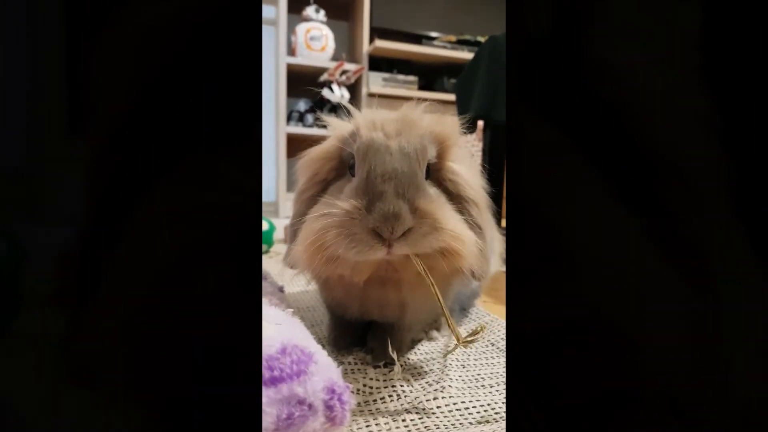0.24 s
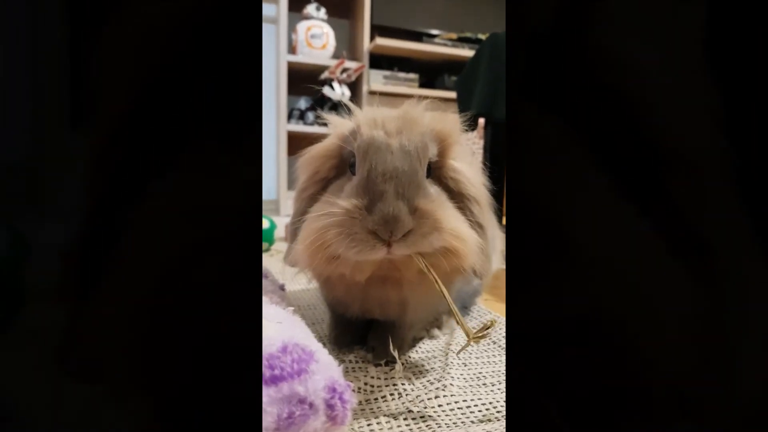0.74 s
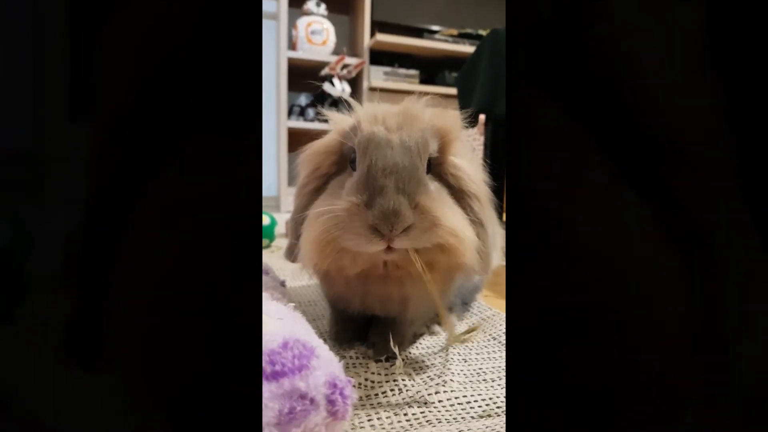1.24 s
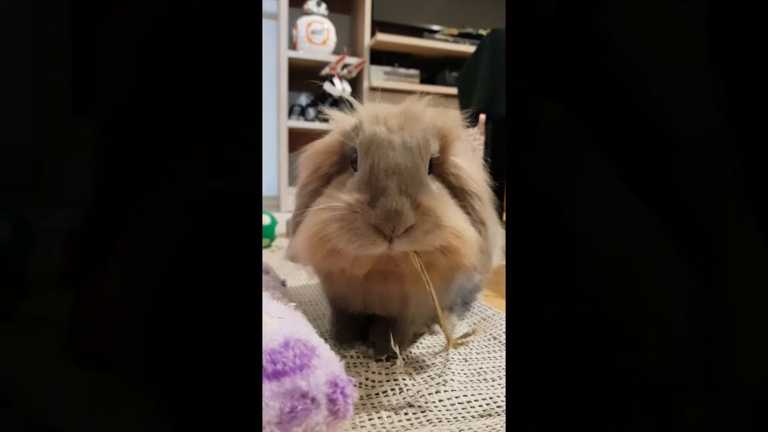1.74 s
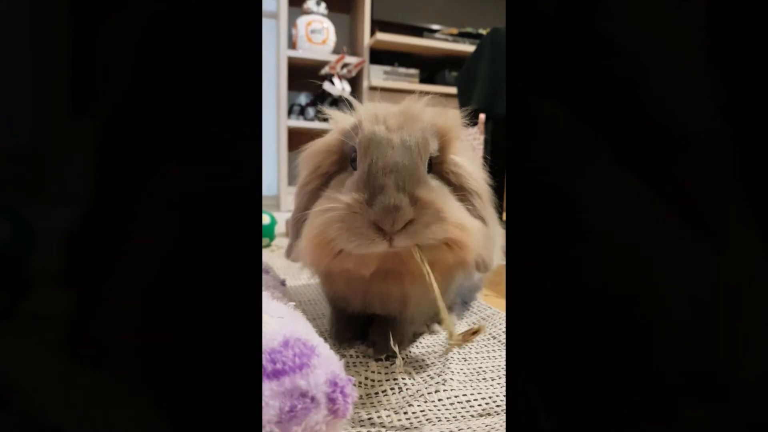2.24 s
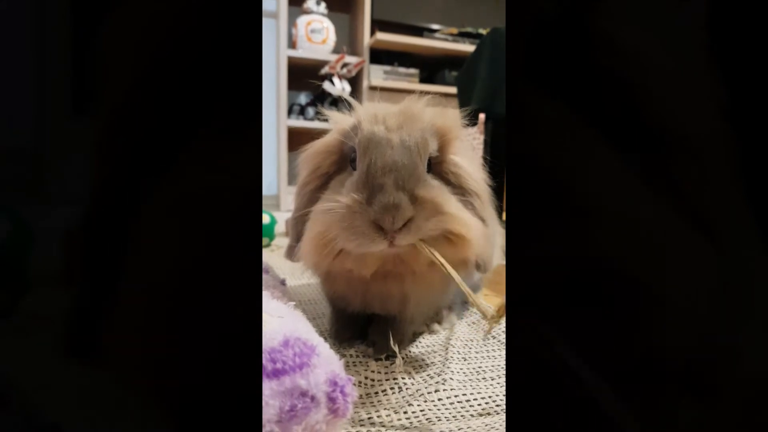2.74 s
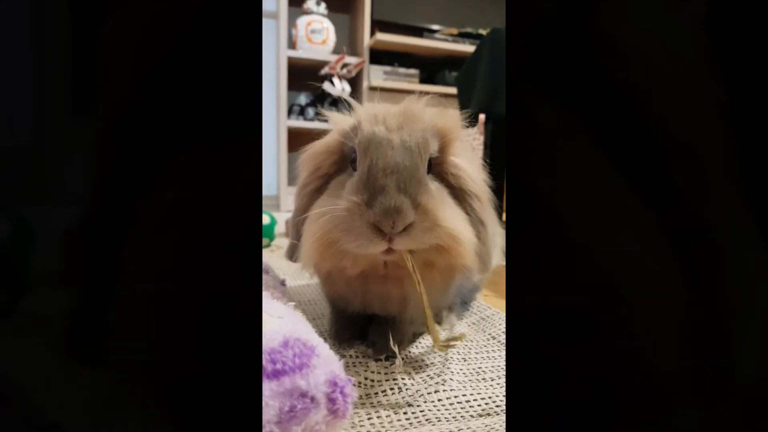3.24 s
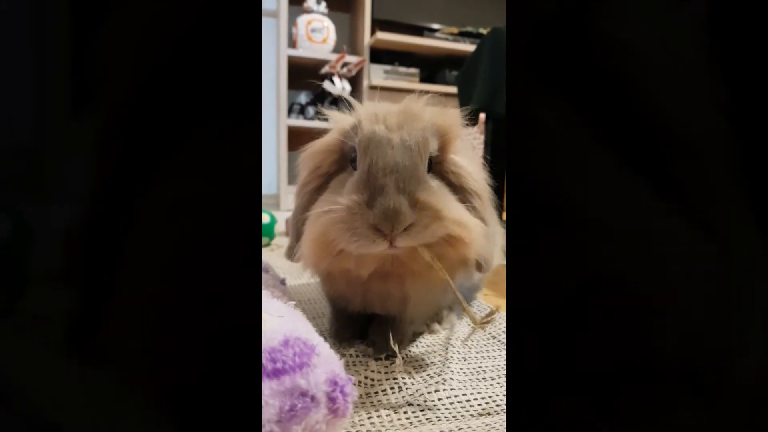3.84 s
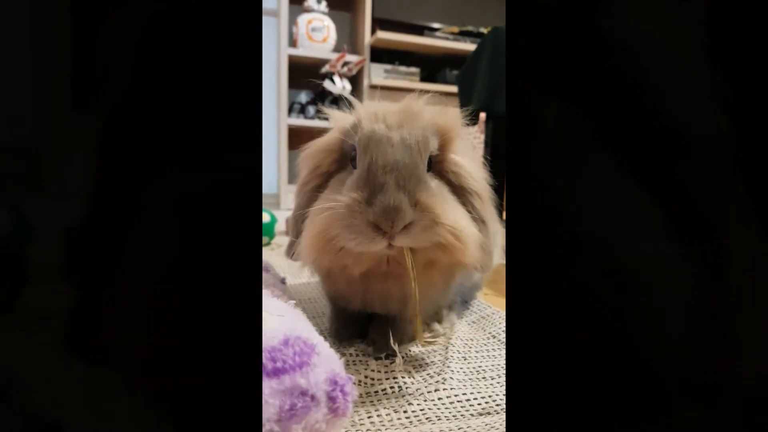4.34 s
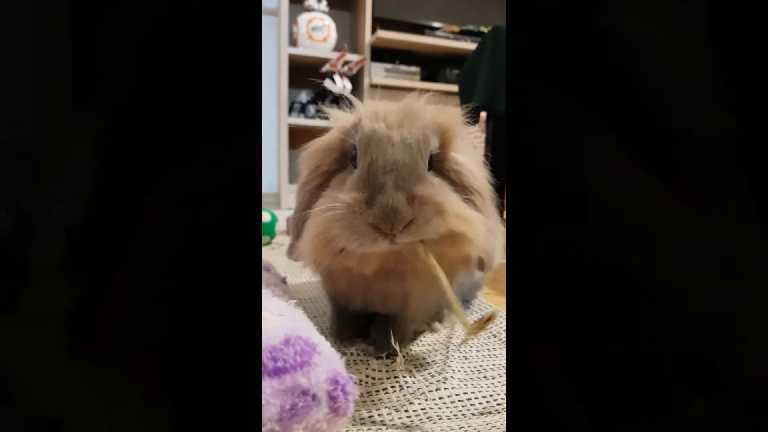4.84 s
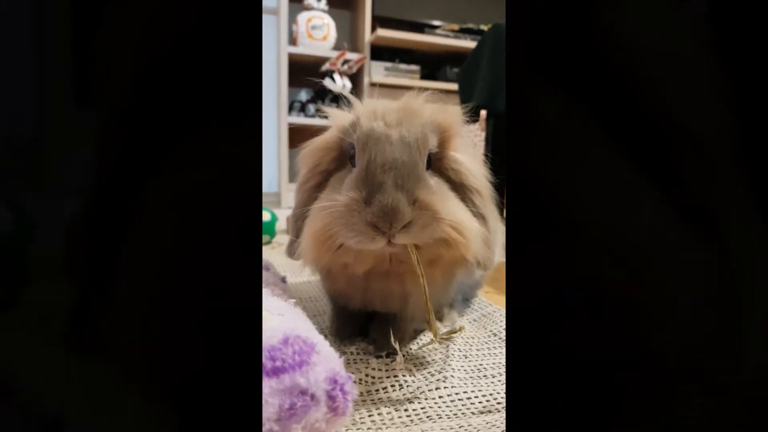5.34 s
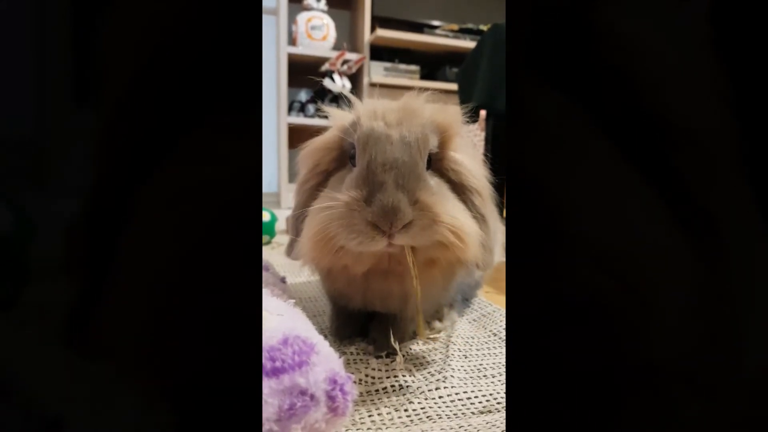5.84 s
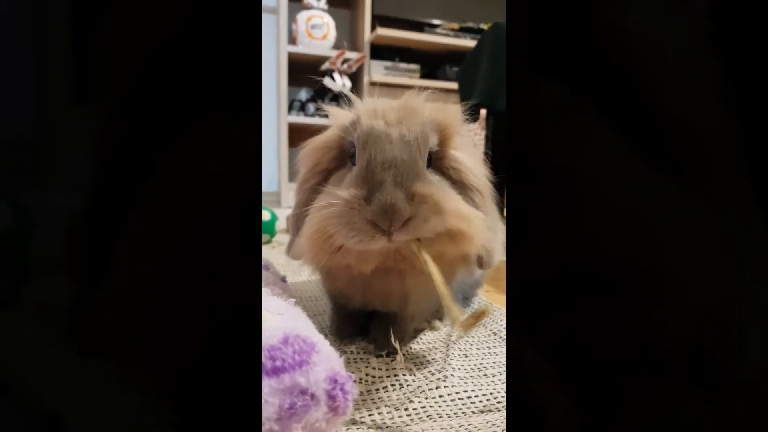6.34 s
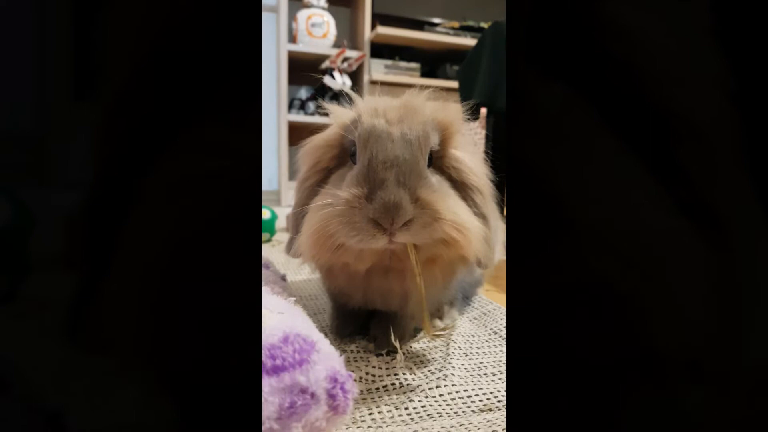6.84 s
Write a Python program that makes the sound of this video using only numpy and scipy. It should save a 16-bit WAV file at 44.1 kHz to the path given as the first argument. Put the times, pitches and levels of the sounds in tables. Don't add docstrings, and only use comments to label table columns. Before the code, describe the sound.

A rabbit chews hay near a hand-held phone in a still room. Small bright ticks and papery rustles sit left over a faint motor hum; the sharpest bite comes near three seconds. The right side is blocked by a fingertip, giving much louder bassy handling boom, dull presses and skin rubs, with repeated heavy knocks from five seconds that then ease off.

```python
import sys
import numpy as np
from scipy import signal
from scipy.fft import rfft, irfft, next_fast_len
from scipy.io import wavfile
from scipy.ndimage import uniform_filter1d, map_coordinates

SR = 44100
rng = np.random.default_rng(int(sys.argv[2]) if len(sys.argv) > 2 else 0)


def magnitude_from_level(level_db):
    exponent = np.asarray(level_db, float) / 20
    return 10 ** exponent


def master(y):
    cut = np.clip(np.atleast_2d(y).T, -1, 1)
    pcm = np.round(cut * 32767)
    wavfile.write(sys.argv[1], SR, pcm.astype(np.int16))


N = 312580


def unit(x):
    return x / np.sqrt(np.mean(x ** 2) + 1e-20)


def along(points, hz):
    f, db = np.transpose(points)
    return magnitude_from_level(np.interp(np.log(hz + 1), np.log(f + 1), db))


def bell(hz, centre_hz, octaves):
    return np.exp(-.5 * (np.log2((hz + 1) / centre_hz) / octaves) ** 2)


def hump(t, middle, half):
    return np.exp(-.5 * ((t - middle) / half) ** 2)


def coloured(x, gain):
    size = next_fast_len(len(x) + 4096)
    spectrum = rfft(x, size) * gain(np.fft.rfftfreq(size, 1 / SR))
    return irfft(spectrum, size)[:len(x)]


def noise(spectrum):
    white = rng.standard_normal(N + SR) * np.sqrt(SR / 2)
    return coloured(white, lambda hz: along(spectrum, hz))[SR // 2:][:N]


def wobble(rate):
    knots = rng.standard_normal(int(N * 40 / SR))
    return map_coordinates(knots, [np.arange(N) * min(rate, 30) / SR])


def add(track, s, sound):
    i = round(s * SR)
    sound = sound[max(-i, 0):len(track) - i]
    track[max(i, 0):][:len(sound)] += sound


# f/Hz, level/dB per Hz
OPEN_AIR_SPECTRUM = [(15, -125), (25, -106), (75, -95.5), (150, -91.5), (240, -97.5), (330, -102),
                     (600, -109), (1200, -112), (3000, -118.5), (5500, -124), (7200, -129.5),
                     (8800, -129.5), (12000, -118.5), (15500, -120.5)]
# f/Hz, level/dB, unsteadiness/dB
HUM_PARTIALS = [(119.8, -67, 1), (126.7, -77, 1.5), (80.2, -77, 2), (99, -82, 2), (240, -88, 3)]
# t/s, level/dB (peak), f/Hz
BODY_BUMPS = [
    (.335, -50, 45),
    (.98, -67, 45),
    (2.787, -56, 54),
    (6.494, -53, 45),
]


def room():
    t = np.arange(N) / SR
    out = noise(OPEN_AIR_SPECTRUM) * magnitude_from_level(0.37)
    drone_level = magnitude_from_level(-78 + 2.5 * wobble(4))
    out += drone_level * unit(coloured(rng.standard_normal(N), lambda f: bell(f, 240, .12)))
    for hz, db, unsteady_db in HUM_PARTIALS:
        level = np.sqrt(2) * magnitude_from_level(db + unsteady_db * wobble(6))
        out += level * np.sin(2 * np.pi * hz * t + .15 * wobble(5))
    short = t[:3000]
    for s, db, hz in BODY_BUMPS:
        add(out, s, magnitude_from_level(db) * np.sin(2 * np.pi * hz * short) * hump(short, .012, .006))
    return out


# f/Hz, level/dB per Hz
SEALED_SPECTRUM = [(60, -130), (200, -98), (300, -101), (500, -110), (1000, -115), (2000, -117.5),
                   (4500, -123.5), (7200, -130.5), (8800, -130.5), (12000, -118.5), (15500, -120)]


def sealed_hiss():
    return noise(SEALED_SPECTRUM) * magnitude_from_level(-0.3)


# t/s, level/dB
TREMOR = [(0.0, -35), (0.16, -41.5), (0.55, -44.5), (0.73, -42), (0.87, -47.5), (1.25, -43.5), (1.75, -42),
          (1.95, -42.5), (2.7, -45), (2.9, -38.5), (3.2, -45), (3.8, -45.5), (4.15, -40.5), (4.35, -47),
          (4.65, -40), (5.15, -43), (5.7, -37), (7.09, -46.5)]
# t/s, depth/dB, half length/s
STILL_MOMENTS = [(0.242, 12, 0.028), (0.438, 10.5, 0.029), (1.106, 5, 0.027), (1.4, 13.5, 0.028),
                 (1.583, 2.5, 0.062), (1.702, -2, 0.0084), (1.927, 8, 0.045), (2.153, 5.5, 0.036),
                 (2.237, 4.5, 0.012), (2.366, 8, 0.07), (2.769, 25.5, .012), (3.077, 9.5, 0.077),
                 (3.382, 17, 0.023), (4.292, 3, 0.073), (4.893, 22.5, 0.012), (4.965, 14, 0.015),
                 (5.19, 5.5, 0.024), (5.313, 15.5, 0.01), (5.414, 12.5, 0.029), (5.51, 18, 0.019),
                 (5.79, 9.5, 0.034), (5.909, 21, .015), (6.062, 12.5, 0.046), (6.221, 10, 0.023),
                 (6.353, 0, 0.017), (6.451, 9, 0.023), (6.534, 14, .015), (6.795, 7.5, 0.013),
                 (6.897, 14, 0.0072)]


def tremor_db():
    t = np.arange(N) / SR
    shaken = np.zeros(N)
    for s, db, *_ in contacts():
        shake_db = min(db - 8, -32.5)
        shaken += magnitude_from_level(shake_db) * hump(t, s, 0.028)
    course = magnitude_from_level(np.interp(t, *np.transpose(TREMOR)))
    level_db = 20 * np.log10(np.maximum(course, shaken))
    for s, depth_db, half in STILL_MOMENTS:
        level_db -= depth_db * hump(t, s, half)
    return level_db


def steadiness():
    t = np.arange(N) / SR
    free = np.ones(N)
    for s, *_ in contacts():
        free *= 1 - .75 * hump(t, s + .008, .018)
    return free


# f/Hz, level/dB per Hz
BOOM_SPECTRUM = [(15, -33), (25, -19), (40, 2.5), (52, 5), (68, 1), (90, -9), (125, -29.5), (170, -40),
                 (300, -90.5)]
# f/Hz, level/dB per Hz
RUBBING_SPECTRUM = [(70, -24), (110, 15.5), (150, 4), (220, -3), (330, -12.5), (450, -39.5), (900, -72.5),
                    (1500, -82)]
# t/s, level/dB
SKIN_CREEP = [(0, 1), (.6, 5), (.85, -2), (1.3, 2), (2.0, -4), (2.7, -5.5), (3.2, 0), (3.95, 4.5),
              (4.4, -4.5), (4.75, 2.5), (5.4, 1.5), (5.85, -3), (6.55, 2), (7.09, 4.5)]


def hand():
    boom_db = tremor_db()
    boom = noise(BOOM_SPECTRUM)
    swell = np.sqrt(np.abs(uniform_filter1d(unit(boom) ** 2, 2600)) + .05)
    boom = unit(boom / swell ** 0.62)
    rub = unit(unit(noise(RUBBING_SPECTRUM)) * magnitude_from_level(0.87 * wobble(27)))
    rub_db = -66 + 1.3 * (boom_db + 44)
    rub_db += 2.5 * wobble(7.1)
    rub_db += np.interp(np.arange(N) / SR, *np.transpose(SKIN_CREEP))
    return magnitude_from_level(boom_db + 4.5) * steadiness() * boom + magnitude_from_level(rub_db) * rub


# t/s (middle), level/dB, half length/s, f/Hz (centre), width/octaves
SKIN_SCUFFS = [
    (0.06, -59.5, 0.0087, 246, 0.32),
    (1.678, -65, 0.0025, 950, .55),
    (2.509, -62.5, 0.0058, 380, 0.76),
    (4.168, -68, 0.011, 555, 0.5),
    (4.606, -74, 0.022, 597, 0.57),
    (4.802, -61, 0.019, 254, 0.38),
    (5.027, -64.5, 0.013, 230, 0.49),
    (5.521, -73, 0.0095, 350, 0.63),
    (6.389, -69.5, 0.012, 600, 0.63),
]


def scuffs():
    out, t = np.zeros(N), np.arange(SR // 5) / SR - .1
    for s, db, half, hz, octaves in SKIN_SCUFFS:
        skin = unit(coloured(rng.standard_normal(len(t)), lambda f: bell(f, hz, octaves)))
        add(out, s + t[0], magnitude_from_level(db) * skin * hump(t, 0, half))
    return out


# t/s (highest pressure), level/dB (peak), rise/s, t60/s, edge/dB re peak
HARD_KNOCKS = [
    (1.6841, -21, 0.0037, .1, -27),
    (3.133, -26, 0.0055, 0.037, -26),
    (5.2687, -14, 0.0025, 0.093, -25),
    (5.337, -12, 0.003, 0.058, -25.5),
    (5.5437, -11.5, 0.0028, 0.071, -25),
    (6.2806, -10.5, 0.0031, 0.087, -24.5),
]
# t/s, level/dB (peak), f/Hz (settling), t60/s, rise/s
LIGHT_FLICKS = [
    (0.7952, -35, 72, 0.13, 0.0017),
    (4.7353, -38.5, 93, 0.057, 0.0038),
    (4.813, -29, 83.7, 0.17, 0.0044),
    (5.0166, -25.5, 55.45, 0.42, 0.0039),
    (5.225, -39, 81, 0.16, .006),
    (5.636, -39.5, 88.3, 0.2, 0.0024),
    (5.67, -41.5, 84.4, 0.11, 0.0039),
]
# t/s, level/dB (peak), f/Hz (settling), rise/s, t60/s
SOFT_PRESSES = [(0.012, -29, 50, 0.013, 0.17), (.047, -27.5, 68, 0.0037, 0.25),
                (0.3339, -26, 64, 0.014, 0.06), (0.7241, -28, 66, 0.01, 0.073),
                (1.475, -33.5, 60, 0.012, .15), (1.612, -29.5, 54.2, 0.011, 0.22),
                (2.19, -33.5, 52, 0.013, 0.093), (2.524, -34, 61.8, 0.011, 0.1),
                (2.801, -28, 55.5, 0.016, 0.13), (2.8541, -33, 67.5, 0.0067, 0.37),
                (3.89, -32, 57, 0.013, 0.092), (4.0327, -34, 65, 0.0071, 0.22),
                (4.179, -23.5, 50.5, 0.013, 0.14), (4.2387, -33, 65, 0.0066, 0.055),
                (4.401, -29.5, 48.7, 0.011, 0.15), (4.5798, -27, 49.6, 0.0062, 0.18),
                (4.637, -29, 56, 0.01, 0.057), (4.756, -25.5, 52.5, 0.032, 0.067),
                (5.71, -32, 54, .012, 0.11), (5.8629, -19, 57.8, 0.019, 0.052),
                (6.389, -23.5, 57.4, 0.011, 0.11), (7.086, -38.5, 59, .013, 0.071)]


def contacts():
    touches = []
    for s, db, rise, t60, edge_db in HARD_KNOCKS:
        touches.append((s, db, 66, rise, t60, db + edge_db))
    for s, db, hz, t60, rise in LIGHT_FLICKS:
        edge_db = db - 21.5 - 4000 * rise
        touches.append((s, db, hz, rise, t60, edge_db))
    for s, db, hz, rise, t60 in SOFT_PRESSES:
        touches.append((s, db, hz, rise, t60, db - 48))
    return touches


# f/Hz, level/dB
EDGE_COLOUR = [(150, 7.5), (300, -0.5), (500, 4.5), (800, 0), (1150, -19), (1500, -23), (2200, -34),
               (5000, -71)]


def taps():
    out, t = np.zeros(N), np.arange(SR // 4) / SR
    lead = .02
    for s, db, hz, rise, t60, edge_db in contacts():
        stretch = min(0.0049 / rise, 1.3)
        turns = hz * (t + stretch * 0.0065 * (1 - np.exp(-t / 0.0058)))
        onset = 1 - np.exp(-(t / (1.28 * rise)) ** 2)
        swing = -np.sin(2 * np.pi * turns) * onset * magnitude_from_level(-60 * t / t60)
        push = np.argmax(swing[:round(SR / hz)])
        start = s - t[push]
        add(out, start, magnitude_from_level(db) * swing / swing[push])
        contact = start + t[np.argmin(swing[:push])]
        fade = np.exp(-np.abs(t - lead) / np.where(t < lead, .002, .012))
        grit = magnitude_from_level(-25.5) * rng.standard_normal(len(t)) * fade
        grit[round(lead * SR)] -= 1
        edge = coloured(grit, lambda f: along(EDGE_COLOUR, f))
        add(out, contact - lead, magnitude_from_level(edge_db) * edge / np.abs(edge[round(lead * SR)]))
    return out


# t/s, level/dB (energy), f/Hz (centre), width/octaves
STALK_SNAPS = [(.0092, -46, 11500, .8), (.0345, -57, 11000, .8), (.65, -52, 7000, 1.8),
               (1.3382, -55, 3000, 1), (1.4, -46, 2800, 1.9), (1.9552, -55, 9000, .7),
               (1.9605, -44, 12500, .55), (1.9694, -48, 9000, 1.3), (2.2605, -55, 1700, .5),
               (2.269, -44.5, 1250, .6), (2.2825, -56, 1800, .5), (2.492, -51, 1300, .9),
               (2.5406, -41, 12800, .3), (2.5406, -48, 5000, .9), (2.5562, -47, 12500, .3),
               (3.0606, -31, 4500, 1.1), (3.0606, -35.5, 1000, .8), (3.0606, -34, 6000, .2),
               (3.0609, -34, 14600, .15), (1.9605, -50, 3000, .8), (3.0751, -41, 12000, 1),
               (3.114, -48, 1900, .35), (3.1328, -43, 9500, 1.5), (4.6124, -50, 12000, .4),
               (5.033, -57, 3300, .4), (6.0628, -54, 2900, .5), (6.1548, -54, 12500, .3),
               (6.394, -53, 1500, .6), (7.026, -56, 2600, .4), (7.0343, -53, 2800, .5)]


def snaps():
    out, t = np.zeros(N), np.arange(SR // 4) / SR
    lead = .01
    for s, db, hz, octaves in STALK_SNAPS:
        burst = np.exp(-np.abs(t - lead) / np.where(t < lead, .0001, .0005))
        cracks = rng.standard_normal(len(t)) * burst
        cracks[round(lead * SR)] = -4
        snap = coloured(cracks, lambda f: bell(f, hz, octaves))
        add(out, s - lead, magnitude_from_level(db) * snap / np.linalg.norm(snap))
    return out


# t/s, level/dB, hold/s, f/Hz (centre), width/octaves
FIBRE_RUSTLES = [(.01, -82, .027, 11100, 0.26), (1.4, -95, .02, 8000, .6), (1.962, -74, 0.017, 12100, 0.19),
                 (1.96, -77, 0.014, 5200, 0.23), (1.965, -88, .02, 8800, .15),
                 (2.543, -74.5, .02, 11900, 0.16), (3.061, -65, .004, 8050, 1.3),
                 (3.062, -68.5, 0.056, 9400, 2.5), (3.062, -76.5, 0.071, 1760, 0.27),
                 (3.372, -80, .033, 9000, .08), (3.37, -77, .015, 12000, 0.65),
                 (4.167, -71, .015, 9500, .08), (4.167, -74, .02, 6800, .08),
                 (4.167, -74, .015, 13500, .25)]


def rustles():
    out, t = np.zeros(N), np.arange(SR // 4) / SR
    t60 = .18
    for s, db, hold, hz, octaves in FIBRE_RUSTLES:
        grains = magnitude_from_level(2.2 * unit(uniform_filter1d(rng.standard_normal(len(t)), 60)))
        fibres = unit(coloured(rng.standard_normal(len(t)) * grains, lambda f: bell(f, hz, octaves)))
        level = magnitude_from_level(db - 60 * np.maximum(t - hold, 0) / t60)
        add(out, s, fibres * (1 - np.exp(-t / 0.0011)) * level)
    return out


def scene():
    hay = snaps() + rustles()
    sealed_port = hand() + taps() + scuffs() + sealed_hiss() + magnitude_from_level(-62) * hay
    open_port = hay + room()
    return np.array([open_port, sealed_port])


def top_cut(x):
    return signal.sosfilt(signal.butter(12, 16520, fs=SR, output="sos"), x)


def record(dry):
    limited = np.array([coloured(port, lambda hz: hz < 15750) for port in dry])
    return top_cut(limited)


dry = scene()
out = record(dry)
master(out)
```